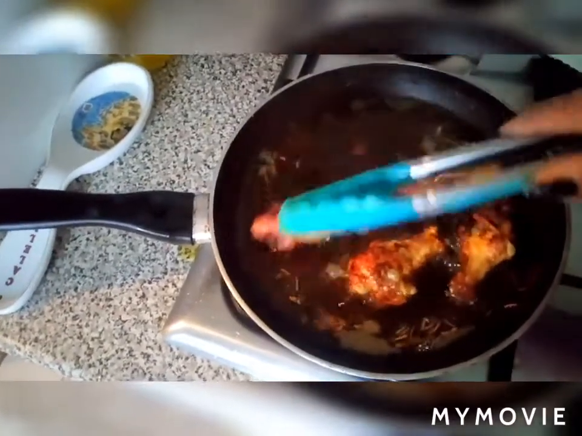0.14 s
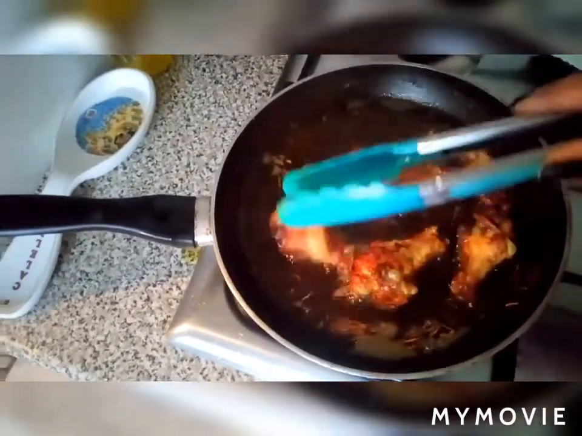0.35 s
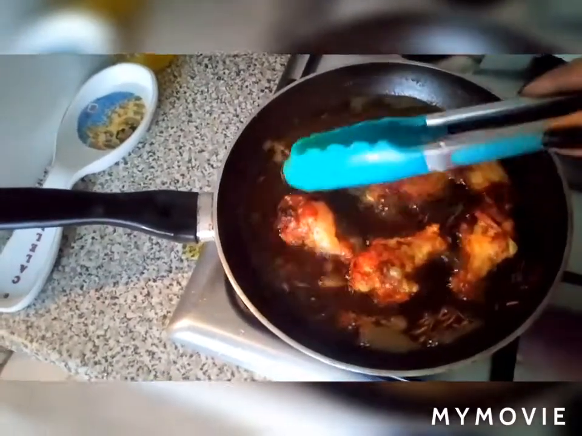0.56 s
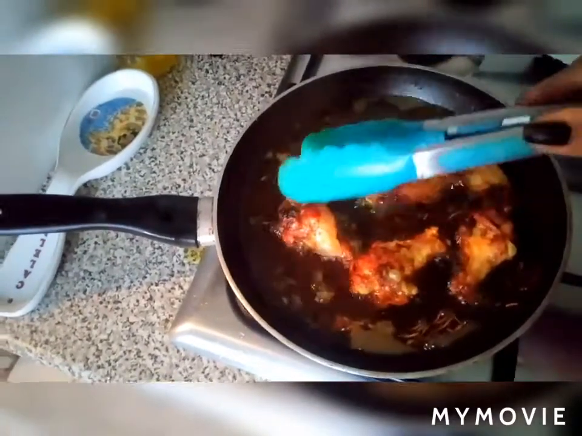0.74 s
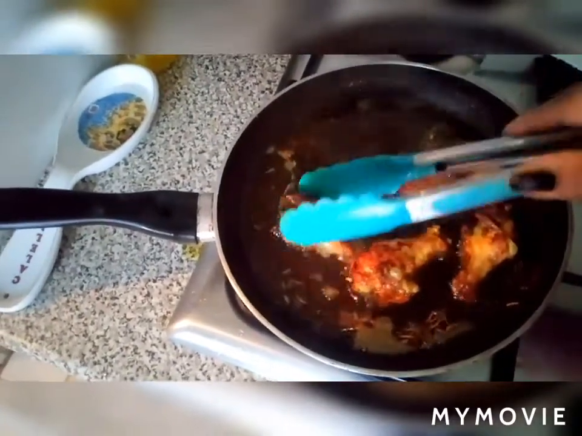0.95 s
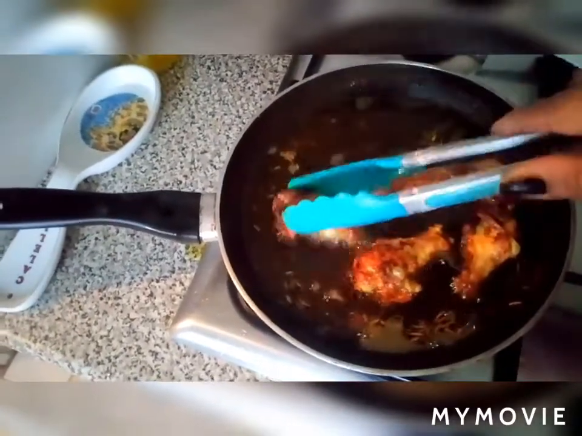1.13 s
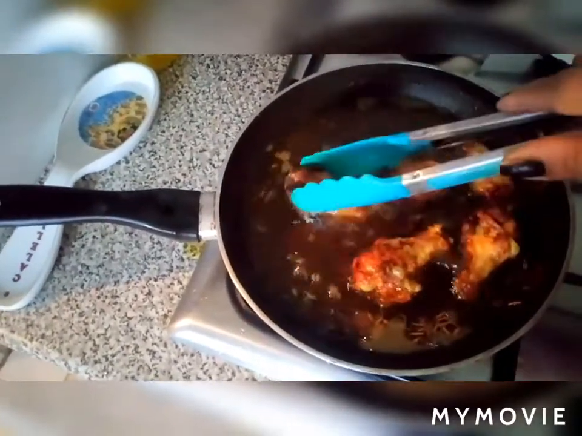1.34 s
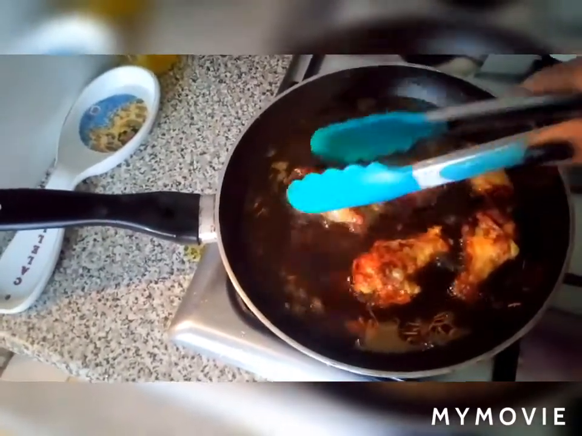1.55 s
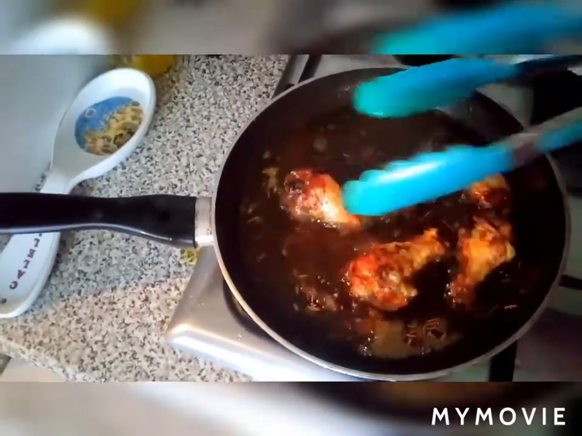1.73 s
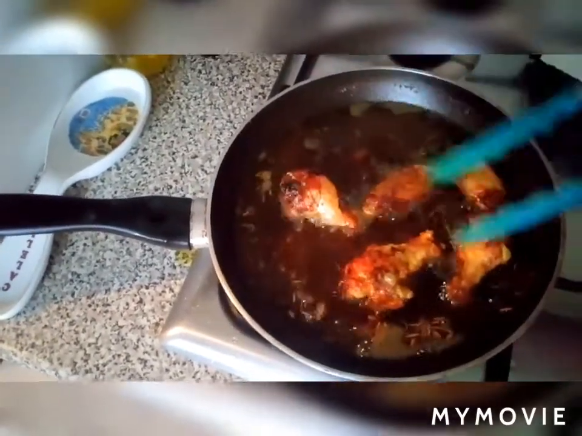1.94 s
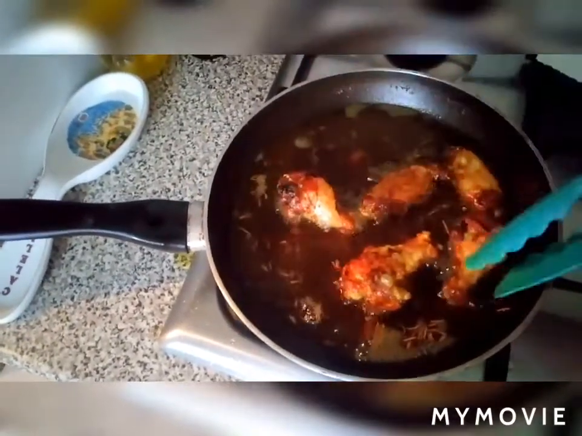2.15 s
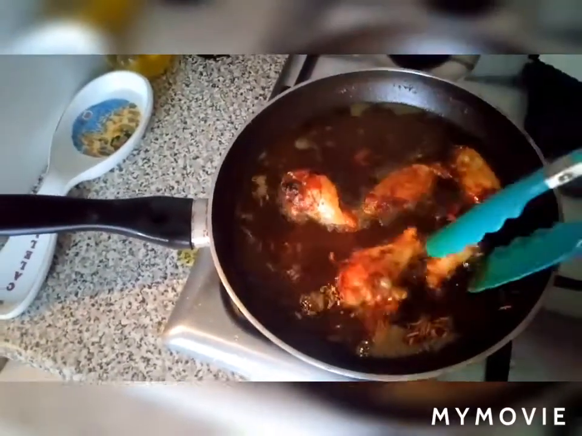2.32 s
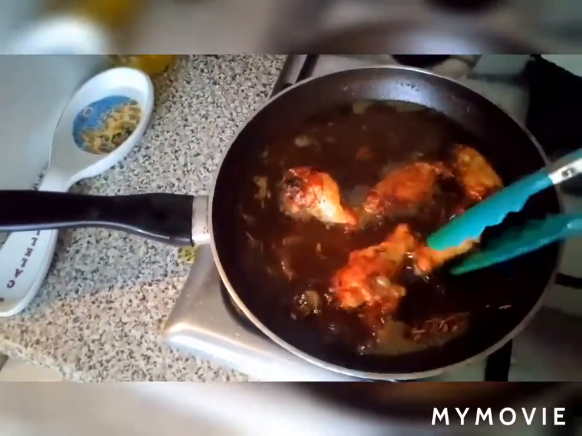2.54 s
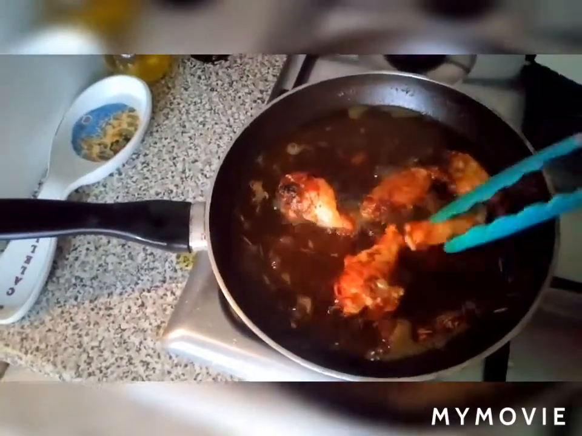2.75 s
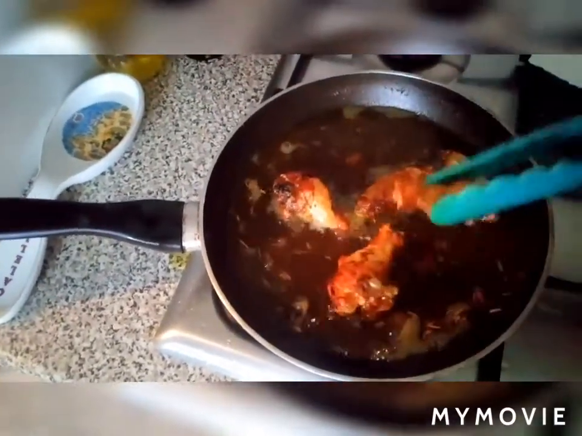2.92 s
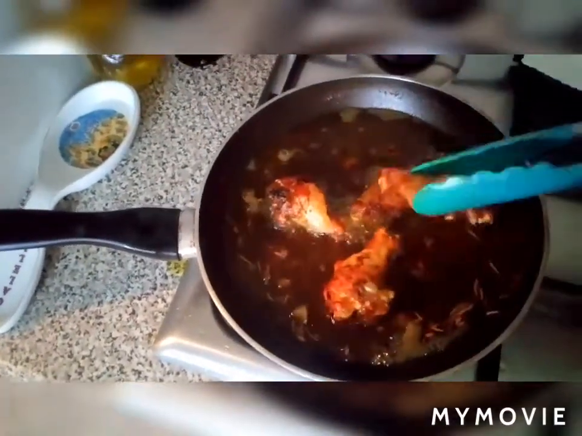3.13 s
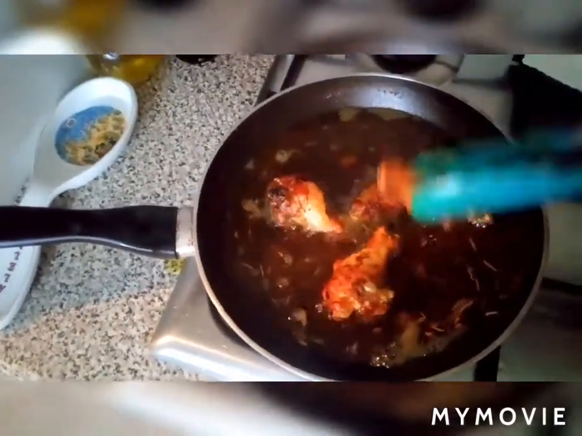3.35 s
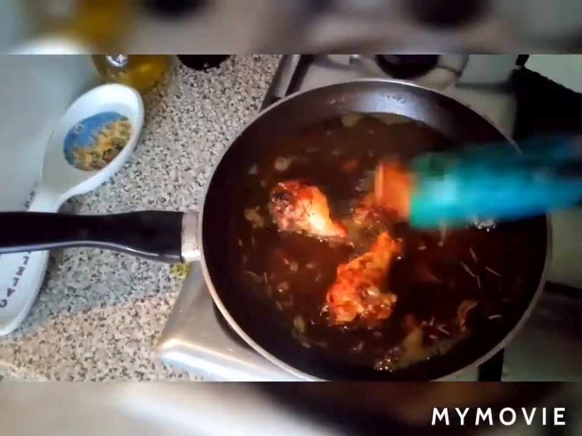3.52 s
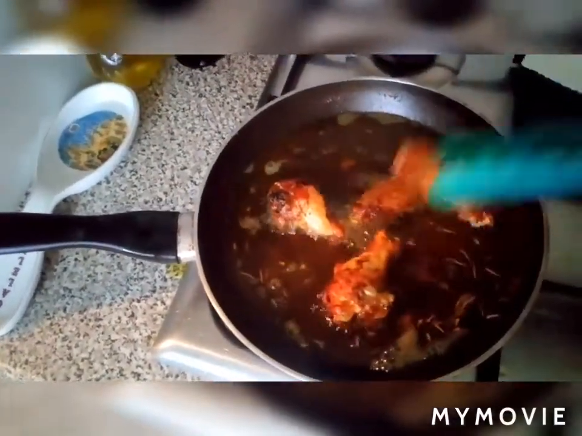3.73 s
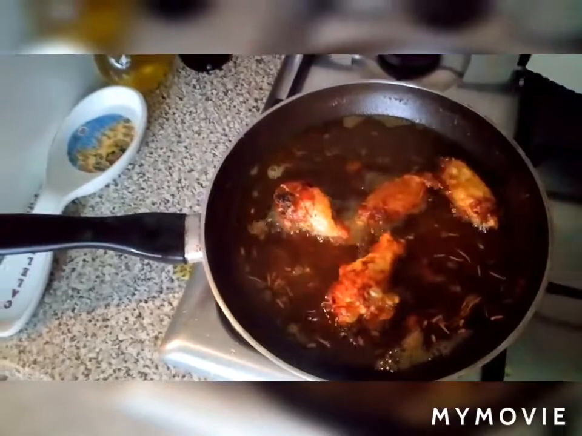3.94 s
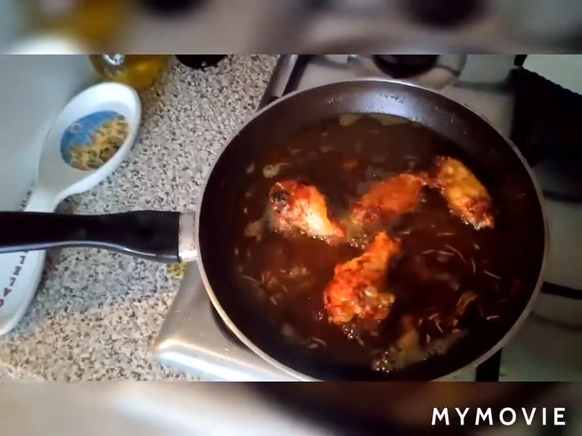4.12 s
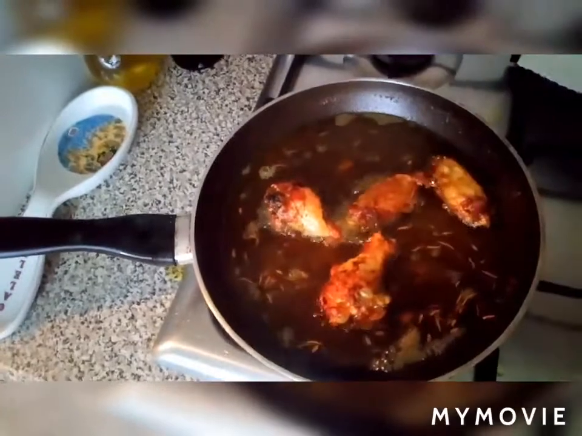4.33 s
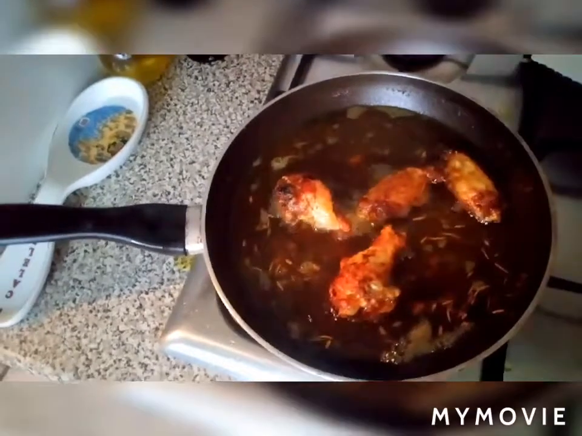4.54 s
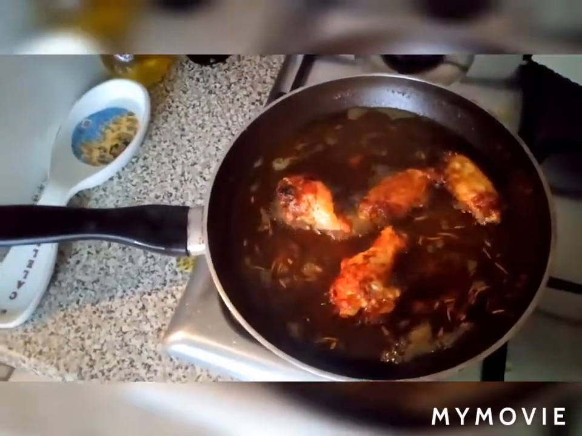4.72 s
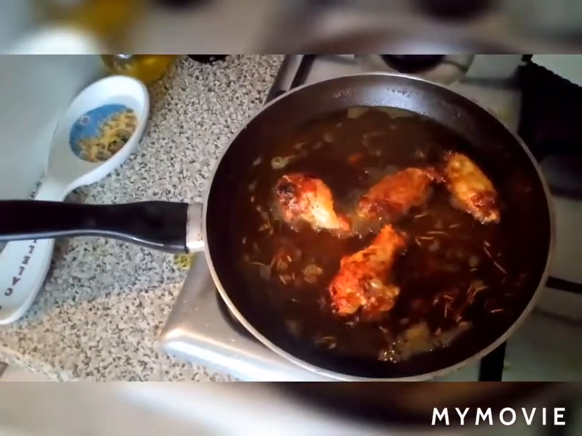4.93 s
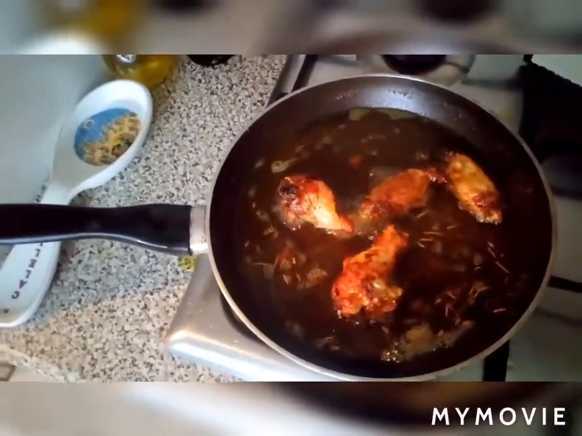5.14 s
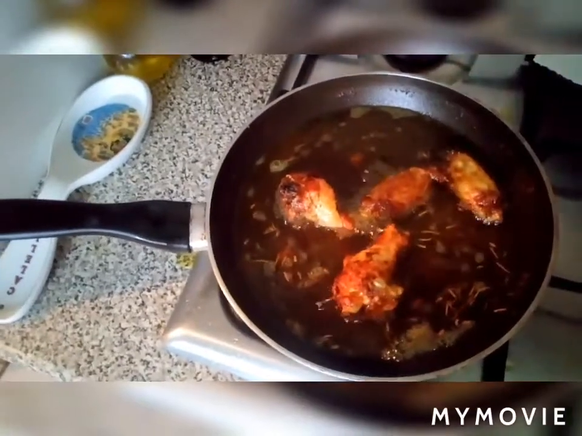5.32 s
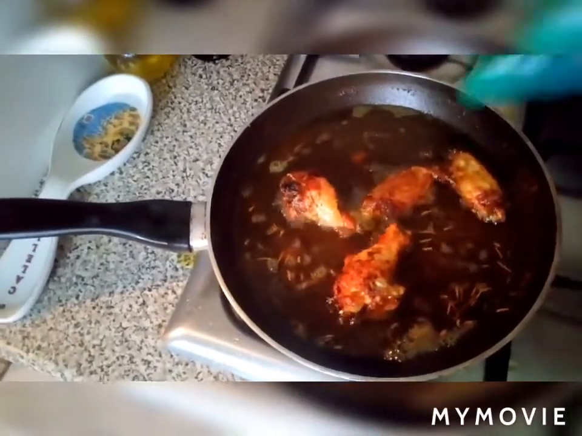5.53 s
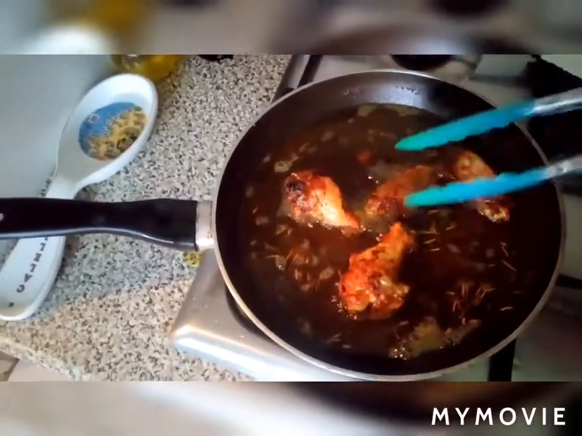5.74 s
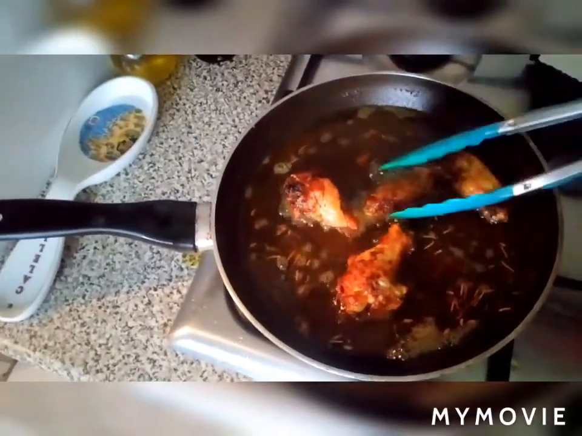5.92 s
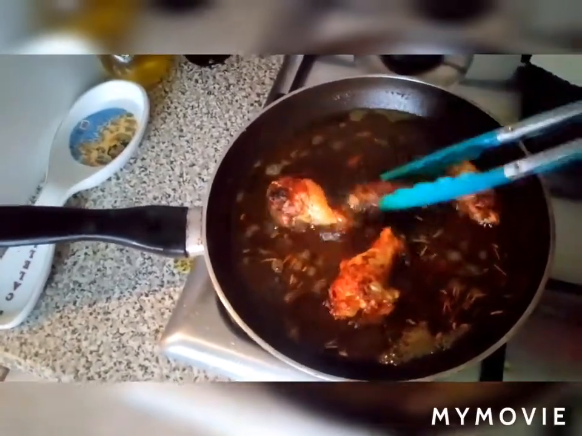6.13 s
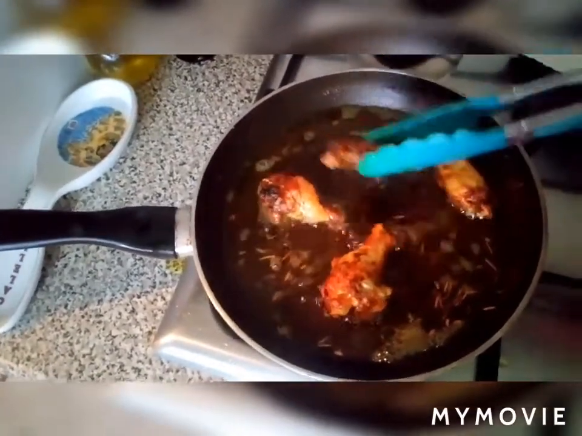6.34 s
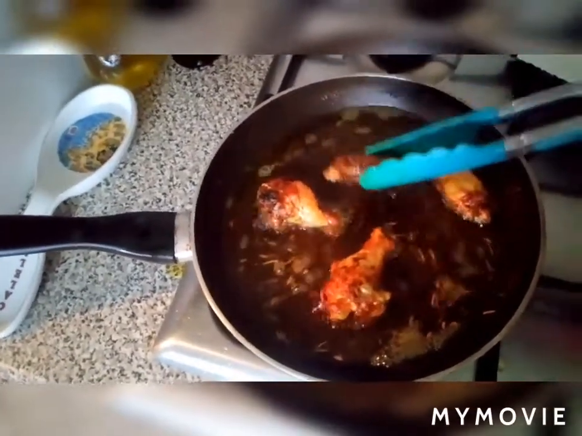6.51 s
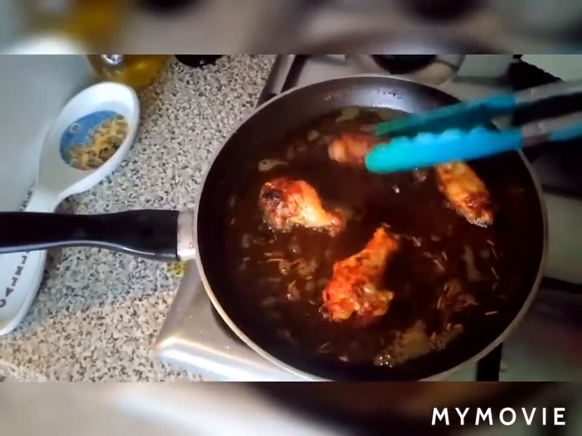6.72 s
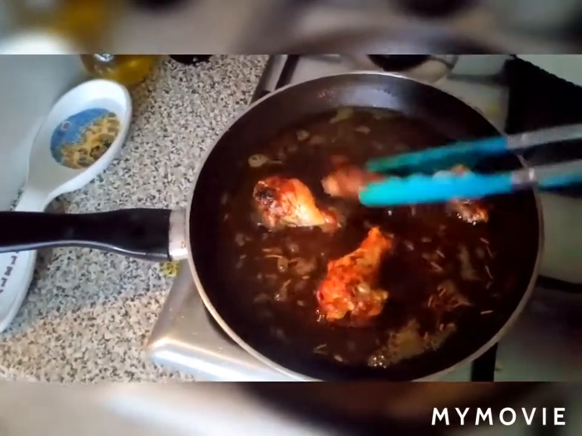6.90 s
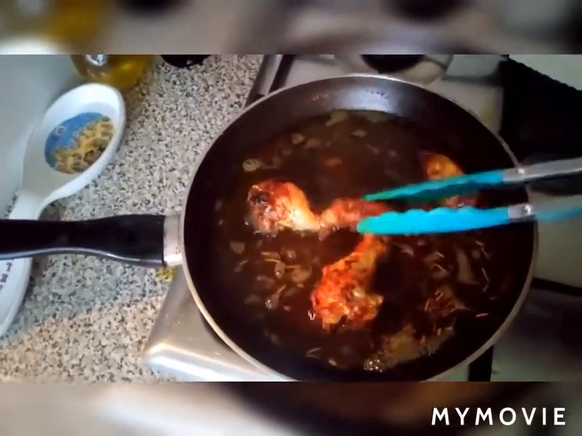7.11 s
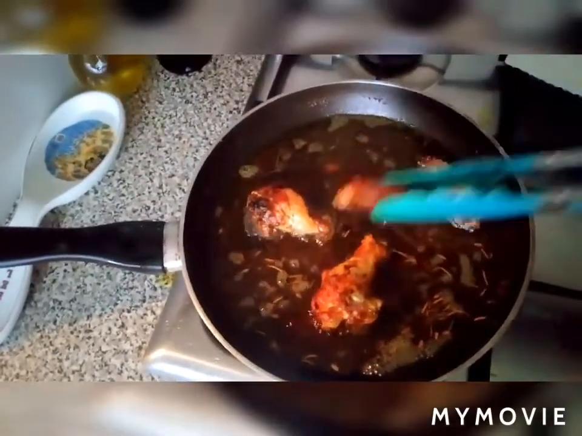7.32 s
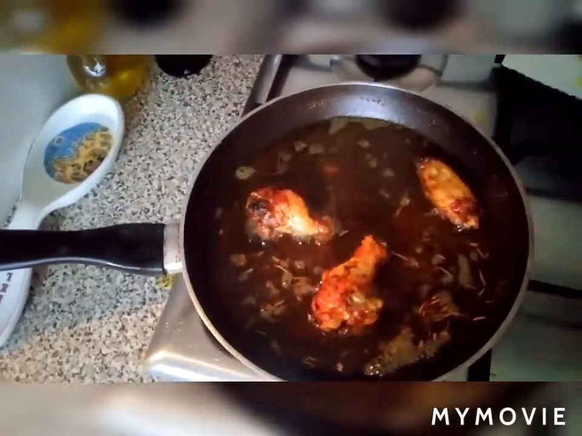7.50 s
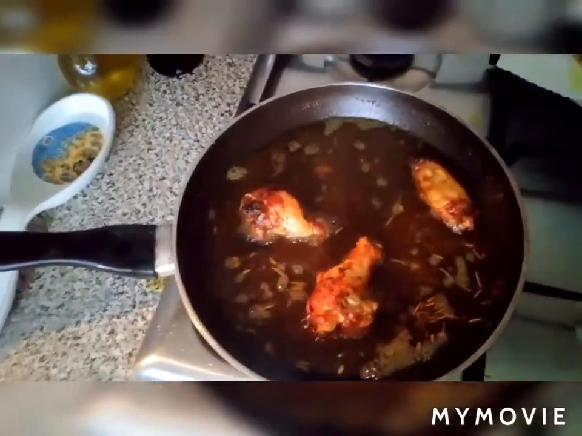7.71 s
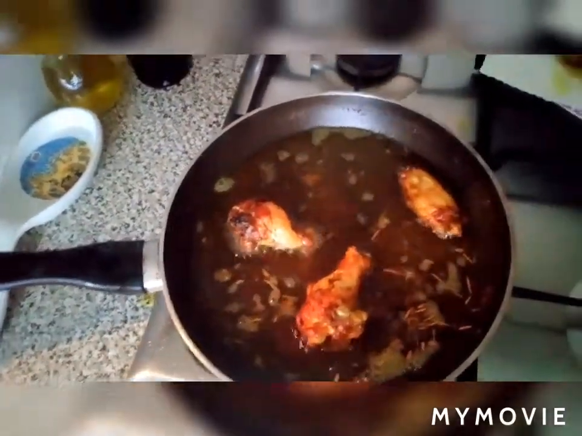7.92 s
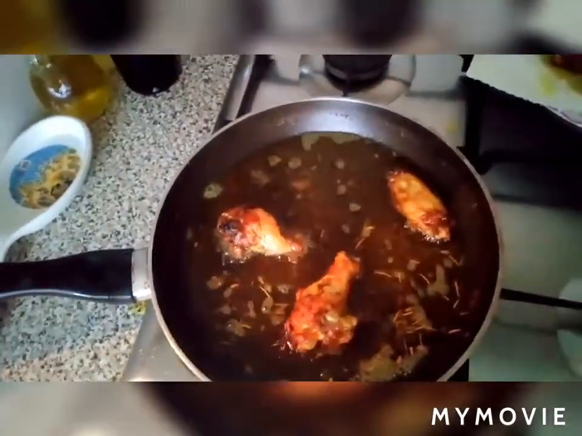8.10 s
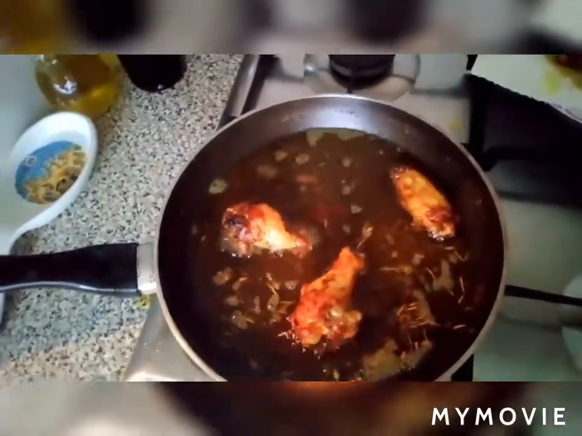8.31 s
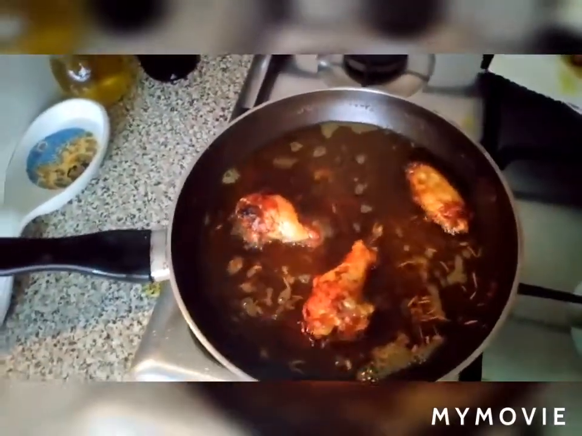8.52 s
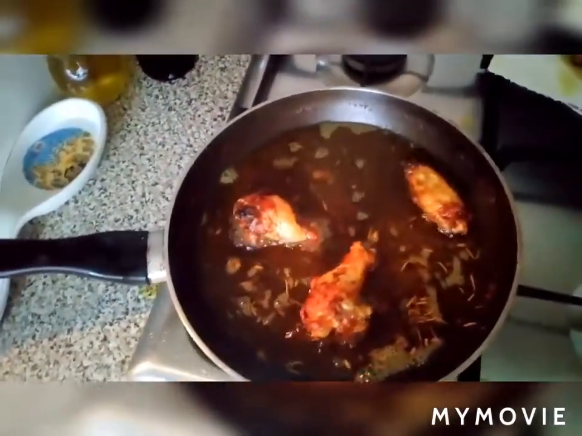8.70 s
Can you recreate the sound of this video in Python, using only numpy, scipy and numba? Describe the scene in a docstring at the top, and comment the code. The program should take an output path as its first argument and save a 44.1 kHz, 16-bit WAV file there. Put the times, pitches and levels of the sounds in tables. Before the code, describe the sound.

Close above a stove, chicken pieces fry in a pan of oil. From 0 to about 2 s the boil is fiercest: a fine bright sizzle, with a brief stronger rush at the very start, packed with sharp snaps, short ringing pops, watery bubble plops and thin spitting droplets. Tiny splutters burst around 0.3, 0.8 and 1.4 s. Near 2 s a barely audible low tone sinks for a quarter second. From 2 to 4 s the fizz eases but hard snaps stand out near 2.6, 2.8, 3.1 and especially 3.9 s. From 4 to 7 s pops become more scattered, with a crisp spit and splutter at about 5.5 s and a small fizz lift near 6.4 s. By 7 to 9 s only thin sizzle and sparse weak ticks remain. A low steady fan drone runs throughout, with slight metallic pan resonance and short kitchen reverberation.

```python
"""Chicken pieces fry in a pan of oil, heard from above the stove, while a kitchen fan drones (filtered noise).
At first the oil boils hard: thousands of tiny ringing bubbles fizz, and small bubbles snap and spray, lone pops
ring briefly, large steam bubbles ring low, droplets spit and pockets of water splutter. At 2 s a faint sine
sinks in pitch for a moment. As the water boils off, the fizz weakens and the pops thin out.
Throughout, the pan rings under the bursts and the kitchen gives the frying a short noise tail."""
import sys
import numpy as np
from scipy import signal
from scipy.fft import rfft, irfft
from scipy.io import wavfile
from scipy.ndimage import uniform_filter1d
from numba import njit

SR = 44100
rng = np.random.default_rng(int(sys.argv[2]) if len(sys.argv) > 2 else 0)


def int16_out(signal):
    """Quantize to a 16-bit WAV file."""
    q = np.round(np.clip(np.atleast_2d(signal).T, -1, 1) * 32767)
    wavfile.write(sys.argv[1], SR, q.astype(np.int16))


N = 386316

# How hard the oil boils. Each row: time in seconds, fizz gain in dB, low simmer gain in dB relative to the fizz.
BOIL_COURSE = [(0.0, -45, 1), (0.14, -52.5, -0.5), (0.24, -49, -4.5), (0.8, -49, -4), (1.56, -49.5, -17.5),
               (1.85, -51, -5), (2.1, -51.5, -8), (2.97, -53, -8), (3.61, -53.5, -7.5),
               (6.03, -53.5, -12.5), (6.44, -51.5, -13), (6.8, -54, -12.5), (8.76, -57, -11.5)]


def undb(db):
    """Amplitude ratio of a level difference: a factor of ten for every 20 dB."""
    return 10 ** (np.asarray(db, float) / 20)


def level(x, db):
    """Scale to a root-mean-square level, the measure of mean power."""
    return x * undb(db) / np.sqrt(np.mean(x ** 2))


def colour(x, points):
    """Minimum-phase filter through (Hz, dB) points: folding the cepstrum of the log gain makes it causal."""
    hz, db = np.transpose(points)
    size = 8192
    grid = np.arange(size // 2 + 1) * SR / size + 1
    log_gain = np.log(undb(np.interp(np.log(grid), np.log(hz), db)))
    cepstrum = irfft(log_gain)
    cepstrum[1:size // 2] *= 2
    cepstrum[size // 2 + 1:] = 0
    impulse_response = irfft(np.exp(rfft(cepstrum)))
    return signal.fftconvolve(x, impulse_response)[:len(x)]


def walk(rate):
    """Slow random modulation: Gaussian levels held 1 / rate s and smoothed by a moving average; spread near 1."""
    hold = int(SR / rate)
    steps = np.repeat(rng.standard_normal(N // 100), hold)[:N]
    return uniform_filter1d(steps, hold // 2)


@njit
def ring(n, at, hz, cycles, size, glide, swell, sr):
    """Damped oscillators: each swells, then dies by 60 dB over three times its cycles; glide raises its pitch."""
    out = np.zeros(n)
    for e in range(len(at)):
        period = sr / hz[e]
        fall = np.log(1000) / (3 * cycles[e] * period)
        phase = 0.
        for i in range(min(int((3 * cycles[e] + swell[e]) * period), n - at[e])):
            phase += 2 * np.pi / period * (1 + glide * i / (cycles[e] * period))
            rise = i / (swell[e] * period)
            if rise < 1:
                shape = rise * rise * (3 - 2 * rise)
            else:
                shape = np.exp(-fall * (i - swell[e] * period))
            out[at[e] + i] += size[e] * shape * np.sin(phase)
    return out


def grains(s, hz, cycles, db, glide, swell=0.45):
    """Superposition of damped oscillators that start at times s; swell is the rise in cycles."""
    at = np.clip(s * SR, 0, N - 1).astype(np.int64)
    pitch = np.clip(hz, 100, .4 * SR)
    rise_cycles = np.maximum(swell + 0 * s, .1)
    return ring(N, at, pitch, np.clip(cycles, .3, 40), undb(db), 1. * glide, rise_cycles, 1. * SR)


def swarm(count, lo_hz, hi_hz, cycles, spread_db, patchy_db):
    """Random superposition of bubbles under a wavering level; rms 1.

    A positive spread makes few of them large, a negative one few of them small."""
    when, pitch, size, length = rng.random((count, 4)).T
    size_db = -spread_db * np.log(1 - .999 * size)
    hz = lo_hz * (hi_hz / lo_hz) ** pitch
    sound = grains(when * N / SR, hz, cycles * (.5 + length), size_db, glide=0.049)
    return level(sound * undb(patchy_db * walk(40)), 0)


def fizz():
    """The steady sizzle as dense bubble noise: each size band wavers by itself, and all follow the boil."""
    s, fizz_db, simmer_db = np.transpose(BOIL_COURSE)
    t = np.arange(N) / SR
    small = swarm(count=20000, lo_hz=3100, hi_hz=5000, cycles=4, spread_db=3.0, patchy_db=.8)
    smaller = swarm(count=25000, lo_hz=5000, hi_hz=8500, cycles=4, spread_db=3.0, patchy_db=.8)
    crackle = swarm(count=1500, lo_hz=2200, hi_hz=7500, cycles=2.5, spread_db=3.3, patchy_db=2)
    tiny = swarm(count=30000, lo_hz=8500, hi_hz=17000, cycles=3, spread_db=2.8, patchy_db=1.5)
    ticks = swarm(count=1200, lo_hz=9500, hi_hz=17000, cycles=1.0, spread_db=-3.0, patchy_db=-27)
    simmer = swarm(count=14000, lo_hz=885, hi_hz=3830, cycles=1.36, spread_db=2.5, patchy_db=3.)
    bright = undb(-12.0) * small + undb(-7.0) * smaller + undb(-5.5) * tiny + undb(-23.0) * ticks
    low = simmer + undb(-2.0) * crackle
    fizz_gain = undb(np.interp(t, s, fizz_db))
    simmer_gain = undb(np.interp(t, s, simmer_db))
    return fizz_gain * (bright + simmer_gain * low)


def kitchen(x):
    """Reverberation: dense echoes from pan rim, tiles and walls, as exponentially decaying noise."""
    t60_s, gain_db = 0.23, -6.5
    t = np.arange(SR // 2) / SR
    decay = 10 ** (-3 * t / t60_s)
    onset = np.clip(t / 0.000086, 0, 1)
    tail = rng.standard_normal(len(t)) * decay * onset
    unit_energy_tail = tail / np.sqrt(np.sum(tail ** 2))
    return signal.fftconvolve(x, unit_energy_tail)[:N] * undb(gain_db)


def fan():
    """Broadband air noise, plus resonances of the hood as narrow bands of noise that waver in level."""
    # Spectrum of the air noise. Each row: frequency in Hz, relative density in dB per Hz.
    air_spectrum = [(15, -52), (42, 2), (76, -4.5), (167, -3.5), (216, -35), (286, 4), (470, -23),
                    (680, -10.5), (1600, -15.5), (2080, -42), (3520, -120)]
    # Resonances of the hood. Each row: frequency in Hz, width in Hz, rms level in dB.
    hood_modes = [(81, 10.4, -63.5), (120, 18, -73.5), (162.3, 16.5, -65), (257.5, 3, -74.5),
                  (286.3, 6, -65.5), (318.6, 26, -70), (912, 8.1, -77), (1630, 94, -69.5)]
    air_db, waver_db = -64, 1.5
    air = level(colour(rng.standard_normal(N), air_spectrum), air_db)
    for hz, width, db in hood_modes:
        edges = [hz - width / 2, hz + width / 2]
        band = signal.butter(1, edges, "bandpass", fs=SR, output="sos")
        hum = signal.sosfilt(band, rng.standard_normal(N)) * undb(waver_db * walk(2.5))
        air = air + level(hum, db)
    return air


def aftermath(s, hz, db, within_s, scatter, cycles, fade_db, count):
    """A decaying cascade: every burst leaves bubbles of like pitch that go off, ever weaker, just after it."""
    when, pitch, size = np.moveaxis(rng.random((len(s), count, 3)), -1, 0)
    late = np.reshape(within_s, (-1, 1)) * when
    size_db = db[:, None] - fade_db * when + 12 * (size - .5)
    hz_each = hz[:, None] * np.exp(scatter * (pitch - .5))
    starts = (s[:, None] + late).ravel()
    all_cycles = np.full(late.size, 1. * cycles)
    return grains(starts, hz_each.ravel(), all_cycles, size_db.ravel(), glide=0.182, swell=1.0)


def with_unlisted(table, over_db, spread_db, lo_hz, hi_hz, rest, count):
    """Columns of the listed bursts plus a random point process of others, whose size follows the boil."""
    thinning = 3.6  # how strongly these crowd toward the start, while the oil boils hardest
    when, size, pitch = rng.random((count, 3)).T
    s = when ** thinning * N / SR
    boil_s, boil_db, _ = np.transpose(BOIL_COURSE)
    db = np.interp(s, boil_s, boil_db) + over_db + spread_db * (size - .5)
    hz = lo_hz * (hi_hz / lo_hz) ** pitch
    more = [s, db, hz] + [np.full(count, value) for value in rest]
    return np.hstack([np.transpose(table), more])


def snaps():
    """Rupture of a small bubble: the film cracks for barely one cycle, the cavity resonates, spray hisses."""
    # The loudest small bubbles bursting at the surface. Each row: start in seconds, reference level in dB,
    # cavity pitch in Hz, spray level in dB and crack level in dB, both relative to the reference.
    listed = [(0.0375, -30, 3940, -39, 4), (0.0718, -23, 5430, -33, 11), (0.1476, -32.5, 6300, -12, 11),
              (0.178, -36.5, 5960, -5, -2), (0.2064, -33, 5450, -4.5, 9), (0.2387, -29, 5020, -9.5, -1),
              (0.2524, -22, 4600, -28, -4), (0.3481, -28, 5900, -17.5, -4), (0.5117, -24.5, 4850, -21, -11),
              (0.538, -25.5, 4200, -16.5, -9), (0.57, -27.5, 5300, -13.5, -2), (0.6511, -18, 5700, -27, 4),
              (0.6766, -31, 5540, -26, 1), (0.7266, -30, 5960, -29, -5), (0.7997, -31.5, 3400, -21, 7),
              (0.821, -25.5, 6140, -19, 2), (0.8889, -34, 3230, -13.5, 0), (0.9157, -25.5, 3370, -17, -8),
              (0.9757, -29, 5850, -18, 3), (1.007, -28, 3420, -13.5, 1), (1.1094, -27, 5870, -26, -12),
              (1.132, -28, 5700, -30, -6), (1.1937, -24.5, 5900, -25, -8), (1.2955, -33.5, 3370, -13, 14),
              (1.3284, -30.5, 3240, -12, 8), (1.4371, -26, 5450, -21, -5), (1.457, -25, 4930, -22, -9),
              (1.484, -27.5, 3330, -17, 6), (1.506, -27, 5060, -17.5, 10), (1.7075, -29, 7100, -16, -4),
              (1.7253, -29, 6460, -29, 1), (1.7833, -28.5, 6600, -20, -9), (1.8507, -28.5, 3140, -12, 8),
              (1.926, -24.5, 4500, -21, -7), (1.9562, -31.5, 5440, -19, 9), (2.0217, -29, 6040, -20, -9),
              (2.0737, -34, 3370, -32, 8), (2.2679, -28, 4900, -25, -11), (2.4029, -32.5, 5500, -20, 12),
              (2.4486, -36, 5300, -10.5, -5), (2.5576, -20.5, 5260, -31, 13), (2.615, -34, 5630, -16, 12),
              (2.643, -35, 3870, -17, 14), (2.676, -32, 6560, -29, -7), (2.7606, -35, 5530, -22, 9),
              (2.806, -17.5, 6750, -38, -3), (2.8272, -25.5, 3970, -19.5, -10),
              (2.8783, -30, 4300, -28, -8), (2.9417, -36, 5340, -29, 11), (2.9685, -35, 5150, -19, -6),
              (2.9948, -27, 6830, -22, -9), (3.0842, -18.5, 6740, -18, -18), (3.1193, -27, 5800, -27, -12),
              (3.1433, -24.5, 3690, -25, 4), (3.2667, -34.5, 5160, -17, 10), (3.2803, -27, 6100, -28, 5.5),
              (3.312, -38, 6170, -11, 4), (3.391, -32, 5480, -21, -4), (3.4311, -38, 5800, -22, 16.5),
              (3.4935, -33, 5830, -16, -7), (3.9145, -23, 6760, -37, 1), (3.9409, -22.5, 6860, -21.5, -15),
              (3.941, -11, 8670, -30, -29), (4.0337, -35.5, 5970, -16, 12), (4.0907, -37, 4530, -25, 10),
              (4.1678, -33, 6200, -31, 6), (4.2677, -23, 4290, -25.5, -18), (4.3313, -27.5, 5500, -17, 1),
              (4.405, -34.5, 5440, -15, 4), (4.722, -34, 3400, -16, 1), (4.738, -48, 3350, -29, -7),
              (4.9526, -37, 3600, -29, -6), (4.9699, -26.5, 3960, -27, -6), (5.0991, -28, 6170, -22, 1),
              (5.2106, -32, 5860, -25, -9), (5.3162, -30.5, 4970, -18, -8), (5.4755, -40, 5630, -26, 13),
              (5.4905, -35, 5300, -26, 15), (5.5912, -30, 6100, -22, 4), (6.0756, -31, 5800, -24, 6),
              (6.1823, -42, 6300, -22, 0), (6.2057, -31.5, 6750, -19, -11), (6.3954, -31, 5650, -29, 3),
              (6.4473, -22.5, 3880, -24, -4), (6.6588, -33, 4700, -24, 4), (6.8753, -40, 5140, -16, 16),
              (7.0482, -32.5, 6000, -23, -7), (7.375, -42.5, 5560, -11, 12), (7.863, -41, 5700, -19, 19.5),
              (8.5534, -38.5, 4730, -21, 19.5), (8.6073, -40, 4700, -15.5, 10)]
    spray_rest_db, crack_rest_db = -16., -2.  # for the unlisted snaps
    rest = [spray_rest_db, crack_rest_db]
    s, db, hz, spray_db, crack_db = with_unlisted(listed, 11, 6, 3800, 6750, rest, count=60)
    ones = np.ones(len(s))
    crack = grains(s + .001, 4500. * ones, .5 * ones, db + crack_db, glide=0., swell=.3)
    cavity = grains(s + 0.00097, hz, 10.6 * ones, db - 4.5, glide=0.006, swell=2.)
    spray = aftermath(s + 0.0018, hz, db + spray_db, 0.036, 0.646, 22.7, fade_db=22.0, count=50)
    return crack + cavity + spray


def pops():
    """Single bubbles as lone damped oscillators: a quick swell up to the listed moment, a short ring."""
    # The loudest lone little pops. Each row: peak time in seconds, peak level in dB, pitch in Hz, cycles rung.
    listed = [(0.04, -20, 6200, 4.2), (0.0433, -23.5, 2510, 2.1), (0.099, -27, 2490, 1.5),
              (0.1045, -27.5, 2400, 3.2), (0.1103, -36, 5180, 2.8), (0.1577, -30, 5810, 1.8),
              (0.18, -26, 5030, 1.6), (0.1845, -33, 5560, 1.5), (0.261, -33, 2430, 3.7),
              (0.3538, -26, 1740, 3.2), (0.397, -28, 2060, 2.5), (0.417, -28, 1760, 1.2),
              (0.4482, -30, 4740, 1.9), (0.5364, -32, 5000, 4.1), (0.571, -20, 4790, 2.1),
              (0.5864, -23.5, 3200, 3.8), (0.8036, -31, 4130, 4.4), (0.853, -32, 2170, 4.7),
              (0.861, -32, 2150, 7.8), (1.026, -42, 3930, 2.7), (1.0347, -30, 5100, 6.4),
              (1.117, -33, 6000, 9.7), (1.124, -35, 6260, 2.9), (1.2365, -29, 5500, 3.3),
              (1.3103, -37, 4110, 1.6), (1.4305, -24, 2200, 9.3), (1.4702, -29, 4940, 2.2),
              (1.53, -25, 5470, 2.4), (1.5467, -37, 5510, 12), (1.579, -31, 2220, 3.5),
              (1.6225, -29, 2230, 1.8), (1.6273, -33, 2260, 5.2), (1.6557, -25, 4850, 1.7),
              (1.6796, -30, 2570, 2.2), (1.6854, -34, 5440, 3.9), (1.7027, -40, 4820, 11),
              (1.751, -25, 5850, 2), (1.873, -35, 3830, 8.7), (1.9164, -34, 5660, 10.3),
              (1.9282, -27, 2000, 8.3), (1.952, -38, 5820, 2.4), (2.1406, -27, 5330, 1.4),
              (2.158, -31, 4270, 2), (2.1645, -34, 5430, 1.4), (2.207, -35.5, 2360, 4.7),
              (2.2551, -40, 4970, 8.5), (2.3458, -26, 6500, 1.7), (2.7154, -32, 4420, 3.1),
              (2.721, -33.5, 2110, 2.7), (2.751, -30, 4240, 2.3), (2.765, -21.5, 6270, 1.6),
              (2.8904, -28, 1700, 0.7), (3.0177, -33, 1920, 4.1), (3.0345, -33, 2110, 1.4),
              (3.0422, -32, 2800, 2.9), (3.143, -35, 2260, 2), (3.172, -39, 3780, 4.7),
              (3.3097, -35, 2260, 5.3), (3.4, -38, 1960, 12), (3.403, -29, 2240, 2.3),
              (3.516, -33, 2500, 3.2), (3.538, -47, 3050, 3.5), (3.5839, -33, 6050, 3.5),
              (3.667, -39, 6370, 5.8), (3.6763, -41, 6840, 6.2), (3.741, -29, 6140, 3.1),
              (3.8003, -43, 2350, 3), (3.8424, -35, 2100, 2.9), (3.8705, -41, 5290, 7.5),
              (3.8934, -31, 2320, 1.7), (3.9339, -43, 5420, 6.2), (3.993, -32, 2160, 4),
              (4.0349, -47, 2470, 0.9), (4.05, -37, 6880, 3.8), (4.09, -35, 2900, 1.4),
              (4.155, -45, 1990, 4), (4.2736, -35, 2560, 3.9), (4.3202, -38, 5140, 2.4),
              (4.4343, -35, 6670, 4.5), (4.472, -37, 5260, 1.4), (4.5333, -34, 5560, 3.4),
              (4.5387, -41, 4300, 1.7), (4.603, -33.5, 2660, 2.4), (4.6469, -26, 5200, 1.2),
              (4.6615, -31, 6320, 3.9), (4.8003, -48, 5900, 5.4), (4.818, -41, 5580, 2.2),
              (4.8356, -40, 2020, 3.7), (4.8593, -38.5, 6370, 11), (4.9707, -34.5, 1710, 3.5),
              (5.0885, -29, 5800, 1.5), (5.149, -45, 5590, 5.4), (5.212, -43, 2660, 2.9),
              (5.2427, -38, 2350, 2.5), (5.246, -41, 5630, 4.3), (5.3188, -22, 5250, 1.6),
              (5.3812, -42.5, 2400, 7.5), (5.401, -38, 5500, 3), (5.4874, -37, 5890, 5.7),
              (5.5019, -39, 5480, 9.1), (5.719, -29, 5640, 2.1), (5.7507, -38, 5330, 1.3),
              (5.852, -36, 4860, 3), (5.873, -34.5, 5620, 2.7), (5.8937, -29.5, 5070, 2.6),
              (5.912, -44, 5410, 3.3), (5.961, -34, 5000, 4.6), (6.02, -26, 5800, 1.1),
              (6.0878, -35, 6360, 5.1), (6.1047, -41, 5990, 16), (6.1245, -38, 5130, 5.6),
              (6.1393, -40, 5990, 7.1), (6.281, -35, 5900, 6.5), (6.3075, -33.5, 1870, 1.3),
              (6.3557, -33, 3800, 3.5), (6.414, -41, 5210, 4.0), (6.449, -32, 3190, 8.9),
              (6.599, -46, 3200, 11.3), (6.6031, -39.5, 2390, 4.1), (6.6519, -48, 6010, 6.7),
              (6.68, -44, 5010, 8.7), (6.6949, -40, 2160, 2), (6.7705, -47, 5280, 4.6),
              (6.8908, -38, 2300, 2), (6.9266, -31, 2350, 2.1), (6.931, -38, 3020, 5.7),
              (7.1726, -36.5, 1980, 1.9), (7.25, -37, 5910, 2.1), (7.2812, -43, 1820, 2.5),
              (7.34, -38, 1540, 0.57), (7.3897, -43, 5250, 2.5), (7.418, -40, 2500, 2.9),
              (7.433, -39, 2240, 0.64), (7.548, -36, 6140, 3.5), (7.557, -43, 2650, 3),
              (7.7634, -48, 5780, 9.9), (7.7757, -45, 4360, 4.9), (7.7943, -34.5, 6060, 2.8),
              (7.842, -37, 2560, 3.1), (7.877, -35, 6740, 8.6), (7.9569, -41, 5630, 2.5),
              (8.047, -47, 2430, 1.0), (8.0906, -35, 2500, 1.6), (8.14, -34.5, 4870, 2.9),
              (8.236, -47, 5320, 11), (8.5404, -43, 2650, 3.1), (8.5934, -42, 3470, 9.2)]
    swell_share = .18  # of the cycles
    s, db, hz, cycles = np.transpose(listed)
    swell = swell_share * cycles
    return grains(s - swell / hz, hz, cycles, db, glide=0.01, swell=swell)


def bubbles():
    """Volume resonance of large bubbles: low plops that open with a tick, a soft thud as the oil closes, followers."""
    # The loudest large steam bubbles. Each row: start in seconds, plop level in dB, pitch in Hz, cycles rung.
    listed = [(0.0416, -44, 2540, 8), (0.0673, -34, 2580, 15), (0.0982, -32, 3230, 16),
              (0.1432, -24.5, 1980, 8), (0.179, -25.5, 1900, 5.5), (0.2124, -31, 2550, 11),
              (0.245, -26.5, 2200, 5.7), (0.3335, -33, 2350, 5.8), (0.353, -33, 1320, 7.6),
              (0.39, -24.5, 2370, 8.7), (0.4145, -28, 2040, 4), (0.4496, -27, 3230, 2.7),
              (0.4813, -25, 2200, 4.9), (0.5765, -28, 1720, 4.9), (0.6325, -28.5, 1444, 17),
              (0.633, -22.5, 1000, 4.4), (0.657, -35, 1620, 6.2), (0.7675, -37, 3280, 14),
              (0.8, -34, 1364, 22), (0.8298, -27.5, 2230, 4.9), (0.8305, -30, 1290, 7.6),
              (0.9166, -25, 2390, 9.4), (1.0048, -27, 3100, 5.9), (1.0341, -29, 2290, 15),
              (1.1316, -33, 3230, 8.9), (1.2201, -29, 1970, 3.3), (1.2904, -27, 1880, 14),
              (1.3147, -26.5, 1400, 5.4), (1.3842, -27, 2280, 5.5), (1.4063, -28, 2230, 6),
              (1.4194, -20.5, 1525, 12), (1.4535, -19, 1600, 4.4), (1.5519, -29, 2720, 3.6),
              (1.573, -31.5, 2420, 5.4), (1.6529, -30.5, 2420, 11), (1.7413, -29, 2300, 8.1),
              (1.8103, -24, 3140, 5.3), (1.8495, -26.5, 2260, 15), (1.8724, -26.5, 1920, 22),
              (1.9106, -24.5, 2160, 11), (1.9619, -31.5, 2100, 13), (2.0466, -35, 2480, 6.9),
              (2.0645, -31, 2380, 9), (2.085, -31.5, 2200, 5.8), (2.149, -37.5, 2330, 23),
              (2.1874, -32, 2200, 4.3), (2.3213, -33, 2120, 4.7), (2.3421, -30.5, 2080, 5),
              (2.359, -24, 1575, 18.5), (2.4374, -27.5, 2080, 2), (2.523, -27, 2600, 8.6),
              (2.5587, -32, 3460, 21), (2.615, -35, 2640, 8), (2.6419, -39, 3200, 8),
              (2.7144, -37, 2480, 7.7), (2.8143, -29.5, 2300, 1.4), (2.848, -38, 1070, 9),
              (2.8732, -33.5, 1880, 6.3), (2.8884, -37.5, 1050, 9.6), (2.989, -24.5, 1850, 9.4),
              (2.9974, -28, 2170, 7.7), (3.119, -23.5, 1885, 18), (3.1862, -31.5, 2620, 8.5),
              (3.3913, -29.5, 1890, 11), (3.431, -35.5, 2740, 11), (3.5072, -24.5, 2820, 1.8),
              (3.778, -35, 2100, 1.5), (3.8077, -30.5, 2100, 5.3), (3.8916, -43, 2200, 6.9),
              (3.9985, -33.5, 1930, 7.3), (4.2592, -31, 1710, 21), (4.3316, -32.5, 2750, 4),
              (4.4273, -31.5, 2500, 4.7), (4.5378, -42.5, 2110, 12), (4.6946, -31.5, 1790, 13),
              (4.7203, -31, 2020, 13), (4.9252, -31, 2050, 7.1), (4.9514, -39, 2140, 7.8),
              (5.2694, -41, 2270, 15), (5.5666, -31, 2620, 3.1), (5.6424, -32, 2970, 3),
              (5.9654, -33.5, 2010, 6.7), (6.0028, -37, 1800, 8.4), (6.4483, -42, 3220, 11),
              (6.9027, -40, 3150, 13), (6.916, -38, 2260, 9.7), (6.9398, -31, 1990, 7.8),
              (7.5328, -38, 1250, 2), (7.535, -44, 790, 4), (7.7685, -39.5, 3180, 4.1),
              (7.8296, -35.5, 1470, 0.81)]
    thud_db, tick_db = -13.5, -10  # relative to the plop
    swell_share, rest_cycles = .16, 4.  # swell as a share of the cycles; cycles of the unlisted bubbles
    s, db, hz, cycles = with_unlisted(listed, 7, 6, 1500, 3300, [rest_cycles], count=30)
    ones = np.ones(len(s))
    plop = grains(s + 0.0003, hz, cycles, db, glide=0.0032, swell=swell_share * cycles)
    thud = grains(s + 0.001, 900. * ones, 1.5 * ones, db + thud_db, glide=0.24)
    tick = grains(s, 2 * hz, ones, db + tick_db, glide=0., swell=.3)
    followers = aftermath(s + .003, hz, db - 14, .04, 0.4, 5.5, fade_db=14, count=10)
    return plop + tick + thud + followers


def pan_ring(x):
    """Modal resonance: convolution lets every burst strike the modes of the pan, which the oil damps."""
    # Modes of the pan. Each row: frequency in Hz, strength in dB.
    pan_modes = [(1040, -22), (1520, -25), (2230, -28), (3330, -24), (5470, -28)]
    t60_s = .055
    t = np.arange(SR // 8) / SR
    modes = sum(undb(db) * hz / SR * np.sin(2 * np.pi * hz * t) for hz, db in pan_modes)
    return signal.fftconvolve(x, modes * 10 ** (-3 * t / t60_s))[:N]


def spits():
    """Impulse of a bright droplet: a thin crack, a short high ring, then a short hiss."""
    # The loudest droplets of water spitting out of the oil. Each row: start in seconds, reference level in dB,
    # hiss level in dB relative to the reference.
    droplets = [(0.1092, -36.5, -1), (0.6767, -33, -3), (0.71, -28, -15), (0.7672, -40, -7),
                (0.7851, -39, 3), (0.8528, -24, -5), (0.966, -41, 4), (1.0828, -24.5, -18),
                (1.1938, -36, 6.5), (2.311, -39, -4), (2.49, -42, 4), (2.5585, -37, -10), (2.805, -30, -7),
                (2.942, -29, -7.5), (2.9941, -39.5, 5.5), (3.5486, -44, 0), (3.7209, -37, -2),
                (3.763, -39, -2.5), (4.0896, -39, -3), (4.167, -36, -11), (4.335, -33.5, -6),
                (4.395, -26.5, -21), (5.4767, -23, -12), (5.4907, -29, -11), (5.6444, -33, -11),
                (5.7495, -41, -11), (6.087, -43, 0), (6.1831, -30, -6), (6.2484, -41, -2),
                (6.3021, -42, -1), (6.3553, -37, -5), (6.394, -38, -12), (6.723, -41, -5),
                (6.875, -37.5, -1.5), (7.025, -41, -7), (7.399, -39, -8), (7.492, -40.5, -5),
                (7.576, -40, -9), (7.863, -37, -6), (7.9373, -40.5, -3), (8.532, -41, -8), (8.554, -40, -7),
                (8.62, -33, -15)]
    crack_db, high_ring_db, rest_hiss_db = 20, 5, -6  # relative to the reference; the last for unlisted spits
    listed = [(s, db, 15100., hiss_db) for s, db, hiss_db in droplets]  # high ring at 15100 Hz
    # grains() holds the high rings of the unlisted ones to at most 0.4 SR
    s, db, hz, hiss_db = with_unlisted(listed, 7.6, 25.0, 17400, 19000, [rest_hiss_db], count=35)
    ones = np.ones(len(s))
    crack = grains(s + 0.00038, 9750.0 * ones, 0.54 * ones, db + crack_db, glide=0., swell=0.19)
    high_ring = grains(s + .0008, hz, 7. * ones, db + high_ring_db, glide=0., swell=3.)
    hiss = aftermath(s + 0.0005, 7900.0 * ones, db + hiss_db, 0.0047, 0.14, 0.95, fade_db=3.0, count=40)
    return crack + high_ring + hiss


def splutters():
    """Dense superposition: hundreds of bubbles of many pitches go off in a rush that fades."""
    # Pockets of water boiling off at once. Each row: start in seconds, duration in seconds, centre pitch in Hz,
    # starting level of single bubbles in dB, spread of pitch in octaves.
    pockets = [(.26, .07, 5500, -49, 2), (0.83, 0.045, 1600, -44, 2), (1.43, 0.08, 2220, -46, 2),
               (2.562, 0.08, 2600, -49, 2.3), (2.815, 0.1, 2600, -52, 2.3), (3.04, .06, 4500, -52, 2),
               (4.925, .06, 2800, -53, 2), (5.496, 0.075, 4100, -45.5, 1.9), (6.903, 0.06, 2950, -51.5, .8),
               (7.864, 0.055, 4800, -57, 2)]
    s, lasts_s, hz, db, octaves = np.transpose(pockets)
    scatter = np.log(2) * octaves[:, None]
    return aftermath(s, hz, db, lasts_s, scatter, 2.5, fade_db=10, count=600)


def sinking_tone():
    """Frequency and amplitude modulation: a faint wavering sine swells, glides down into the hum and fades."""
    start_s, lasts_s, rise_s = 2.01, .27, 0.05
    from_hz, to_hz, mean_db = 325, 281, -64
    t = np.arange(N) / SR - start_s
    glide_hz = np.interp(t, [0, lasts_s], [from_hz, to_hz])
    shape = np.clip(np.minimum(t, lasts_s - t) / rise_s, 0, 1)
    amplitude = np.sqrt(2) * undb(mean_db + 4 * walk(30.6)) * shape
    hz = glide_hz + 9 * walk(35.2)
    return amplitude * np.sin(2 * np.pi * np.cumsum(hz) / SR)


def scene():
    """Linear superposition of the pan, its echoes, the fan and the sinking tone."""
    bursts = bubbles() + snaps() + spits() + pops()
    pan = bursts + pan_ring(bursts) + splutters() + fizz()
    return (pan + kitchen(pan) + fan() + sinking_tone())[None]


def record(dry):
    """Linear filtering: the microphone's frequency response, then a steep elliptic low-pass."""
    # Microphone colour, dull above 7 kHz but for the resonance of its port. Each row: frequency in Hz, gain in dB.
    mic_response = [(30, -13), (4500, 2.5), (6200, 3.5), (7200, 0), (8400, -7), (11000, -10.5),
                    (13700, -11), (14400, -1), (15100, 4), (15800, -1), (16150, -42), (17000, -14)]
    top_hz = 16900
    low_pass = signal.ellip(10, .2, 70, top_hz, fs=SR, output="sos")
    return signal.sosfilt(low_pass, colour(dry[0], mic_response))[None]


dry = scene()
out = record(dry)
int16_out(out)
```